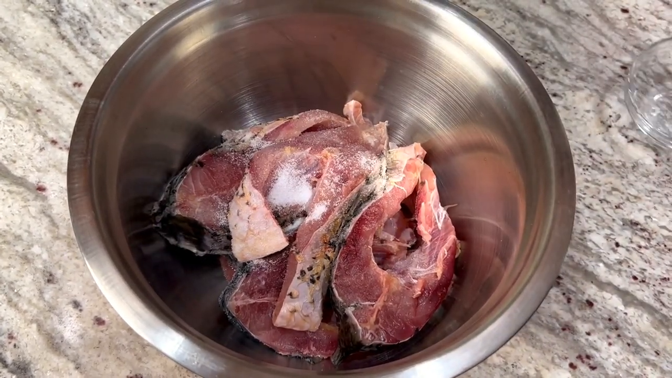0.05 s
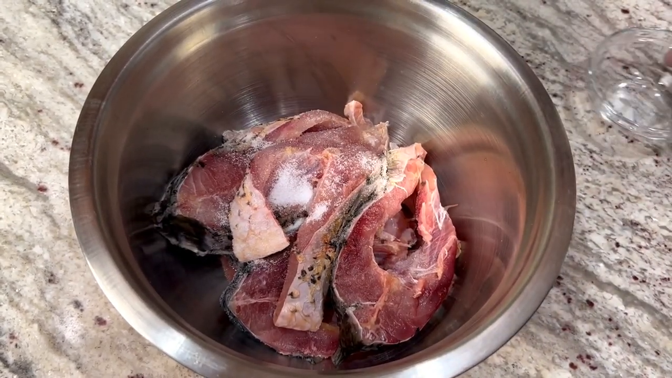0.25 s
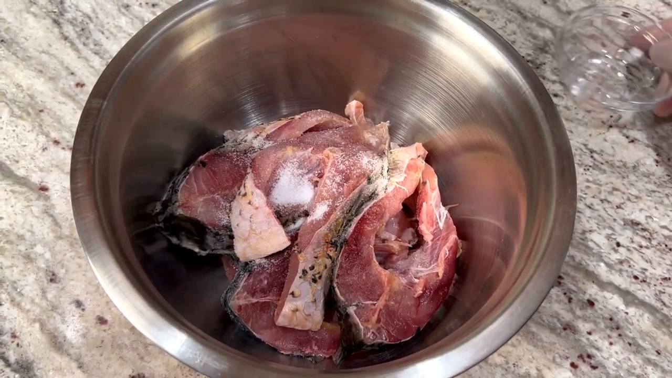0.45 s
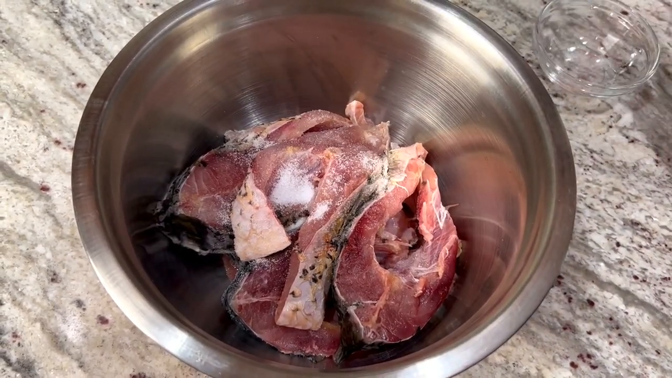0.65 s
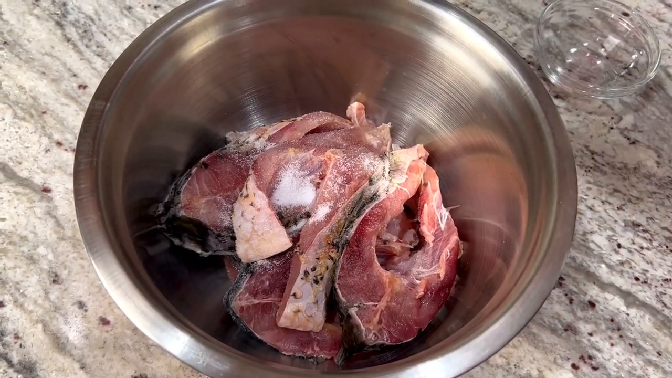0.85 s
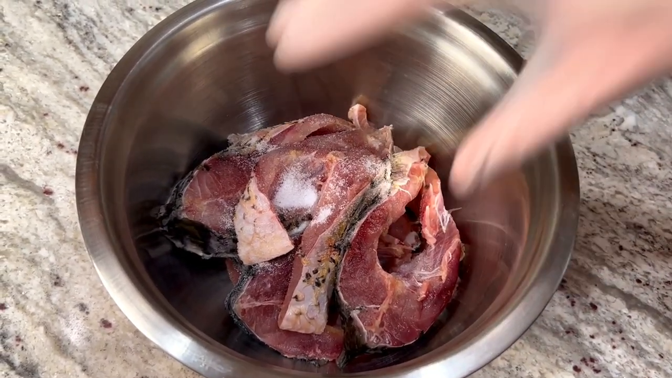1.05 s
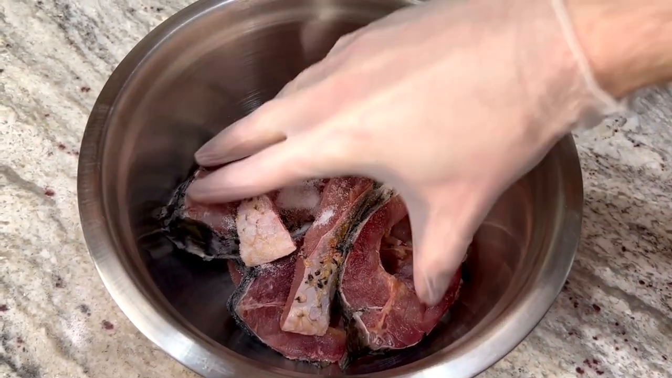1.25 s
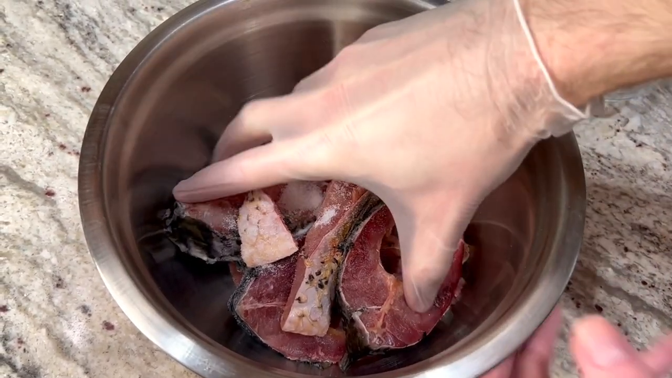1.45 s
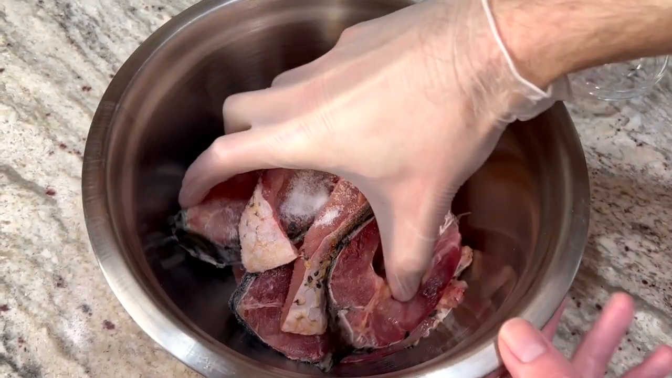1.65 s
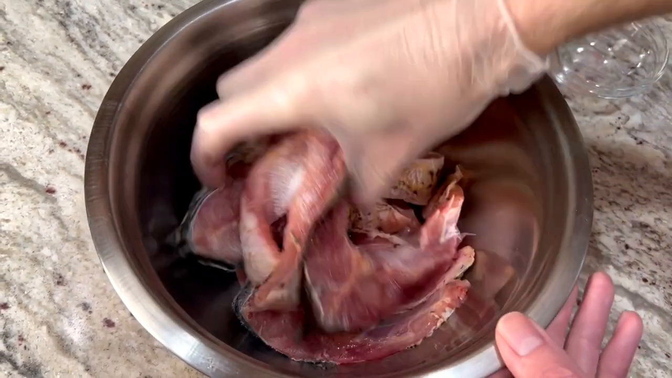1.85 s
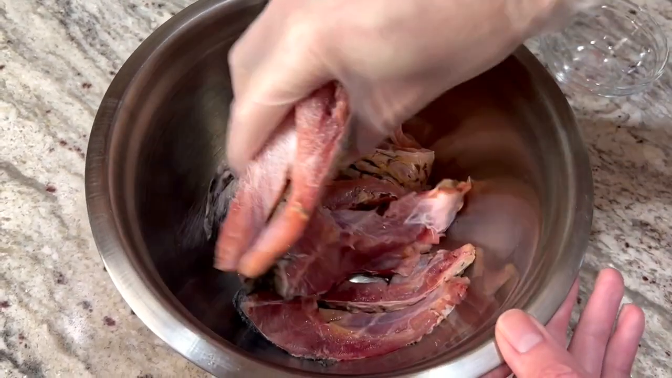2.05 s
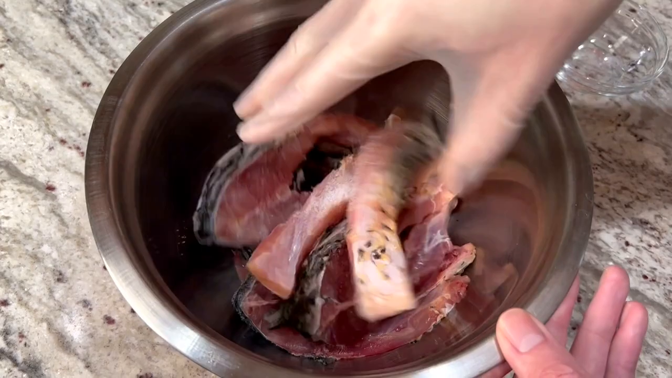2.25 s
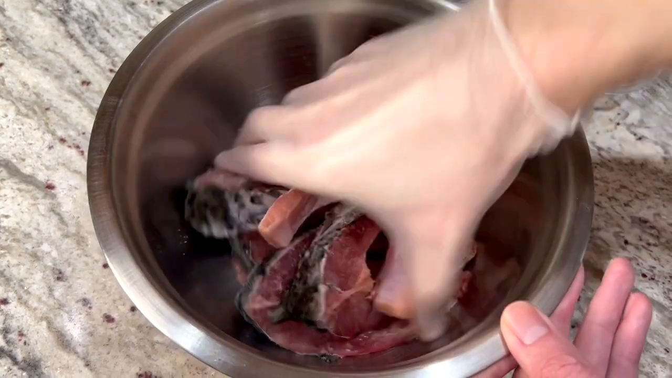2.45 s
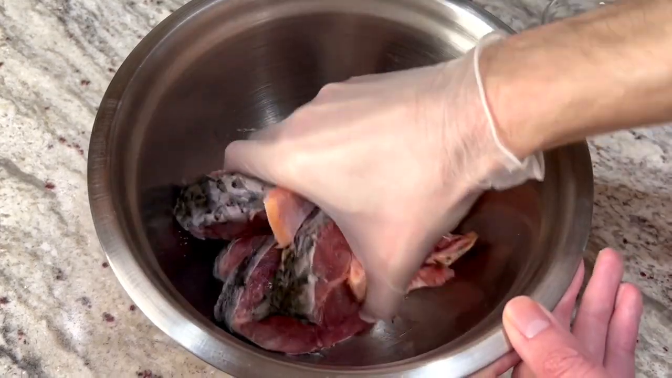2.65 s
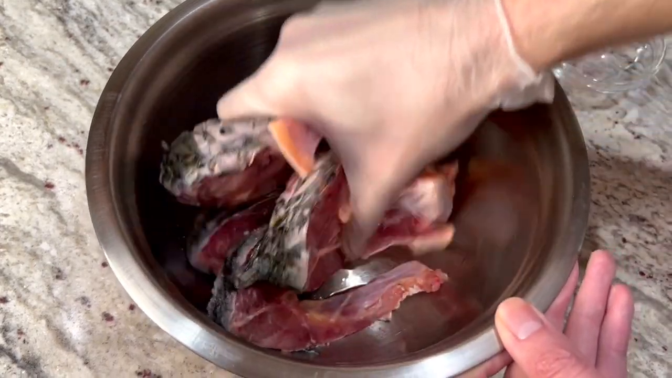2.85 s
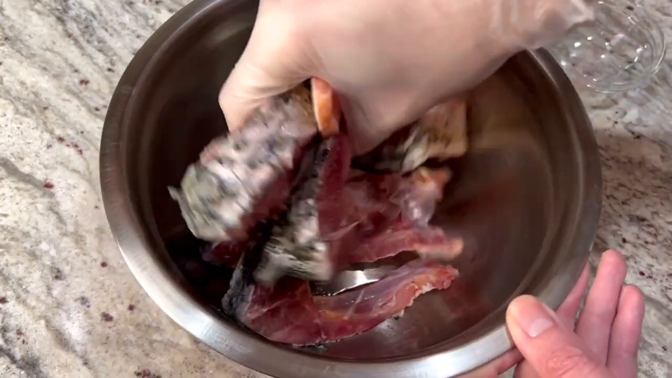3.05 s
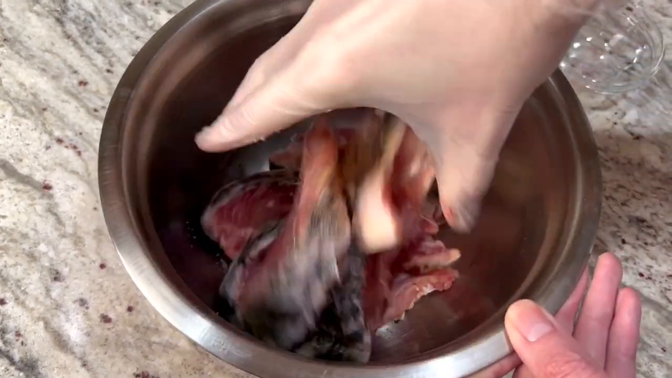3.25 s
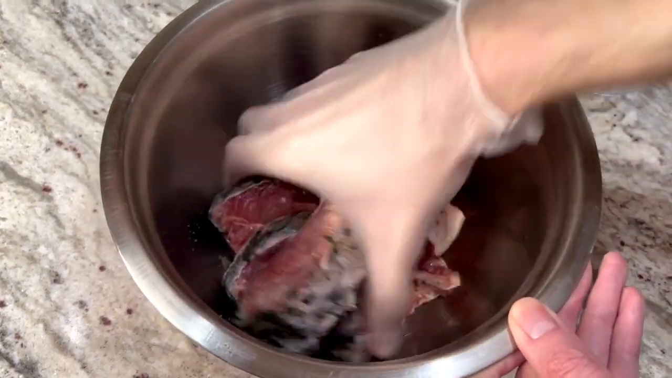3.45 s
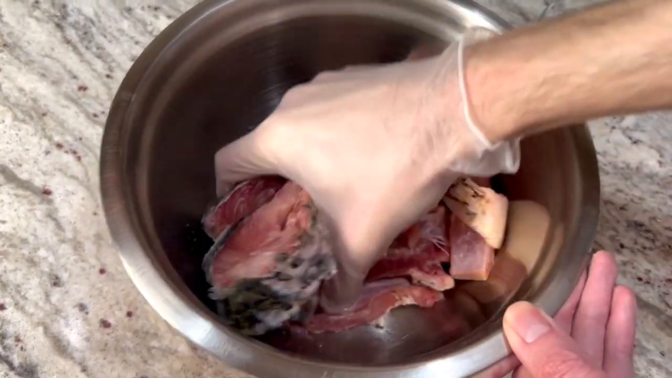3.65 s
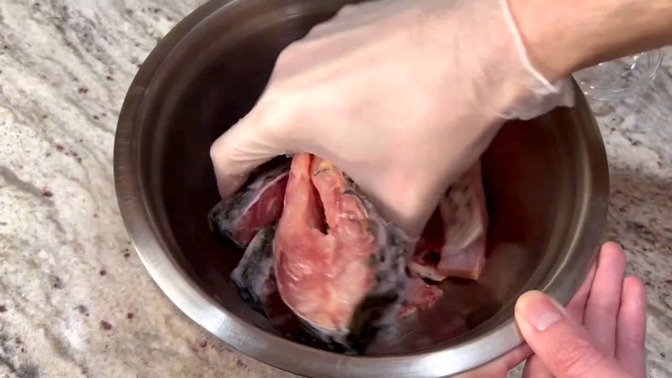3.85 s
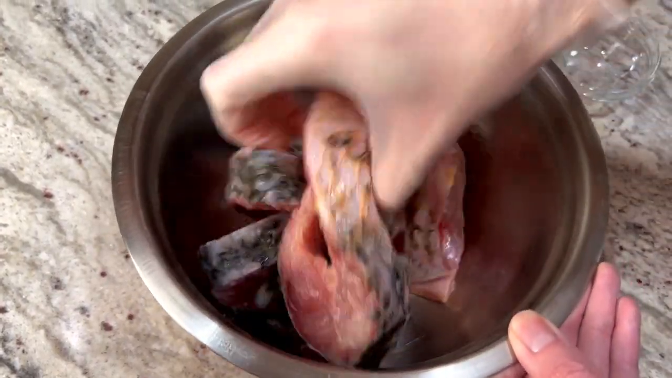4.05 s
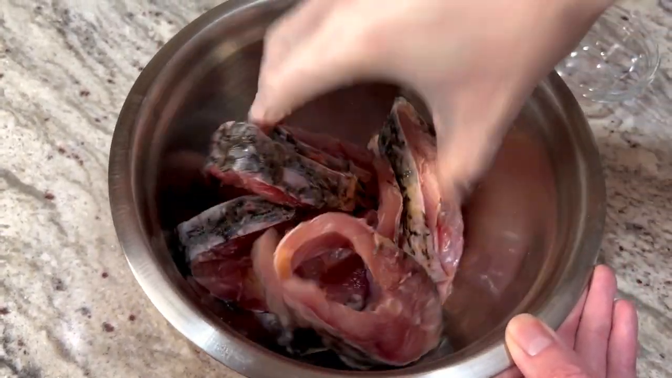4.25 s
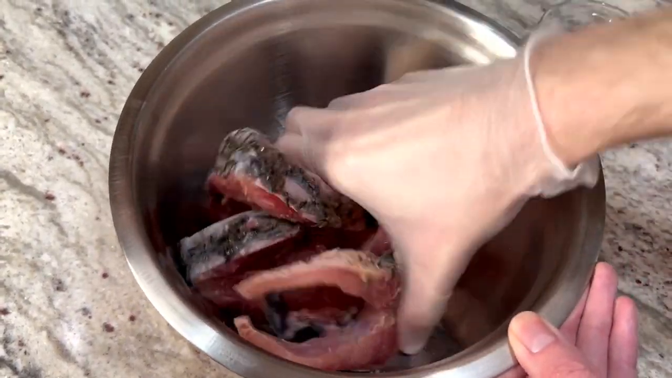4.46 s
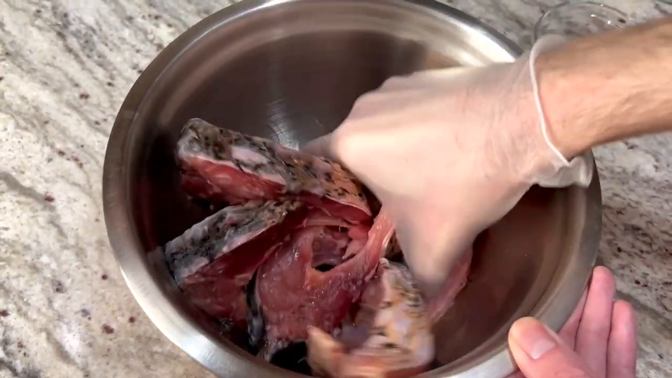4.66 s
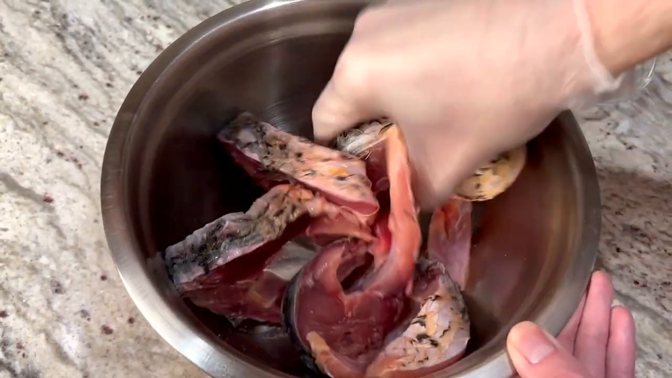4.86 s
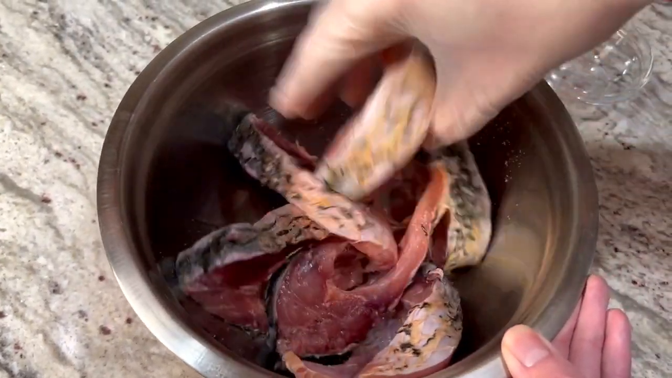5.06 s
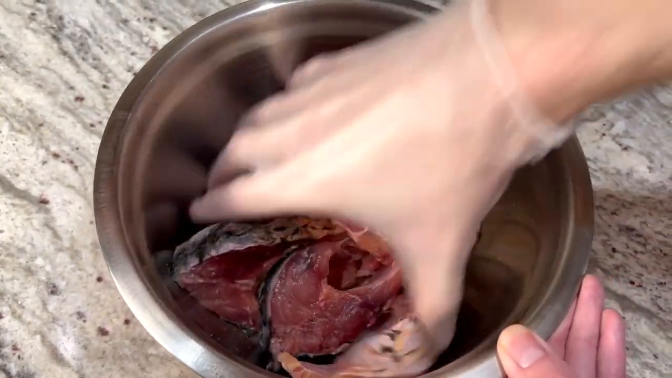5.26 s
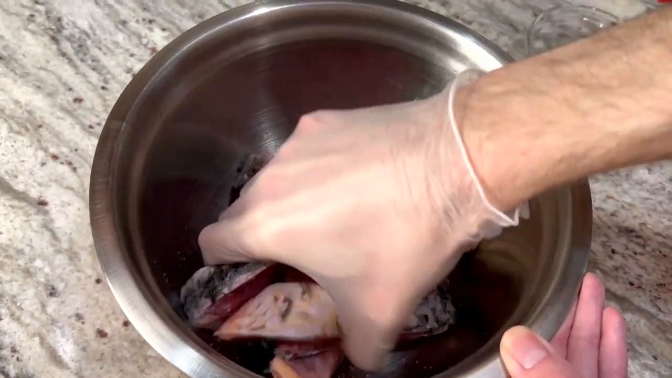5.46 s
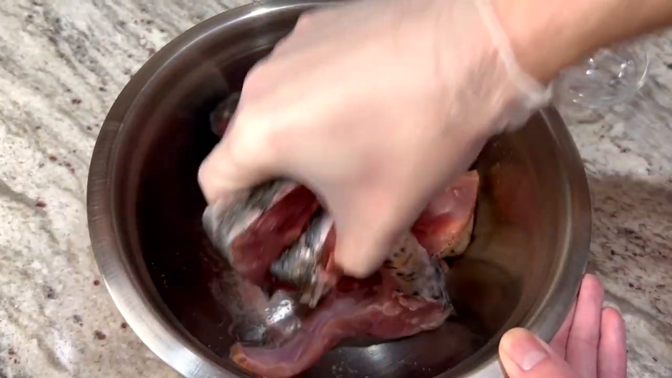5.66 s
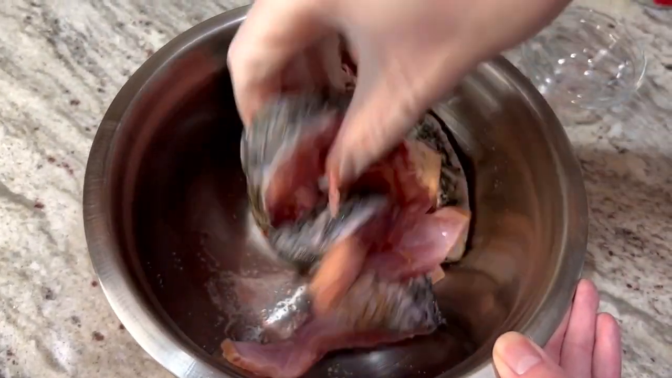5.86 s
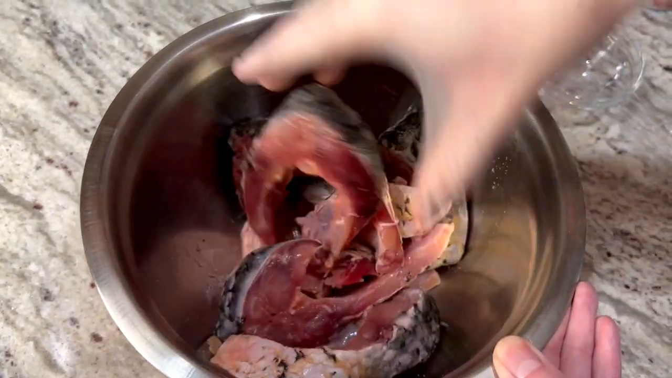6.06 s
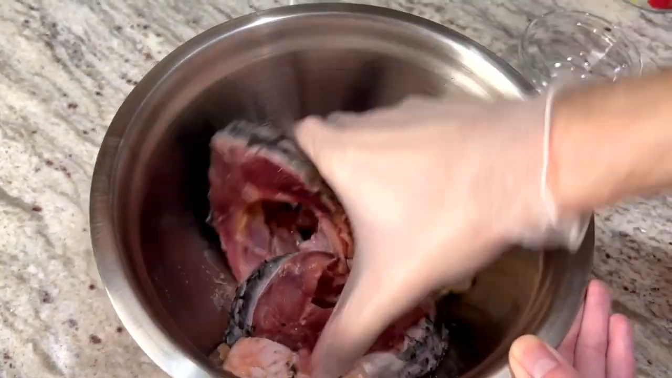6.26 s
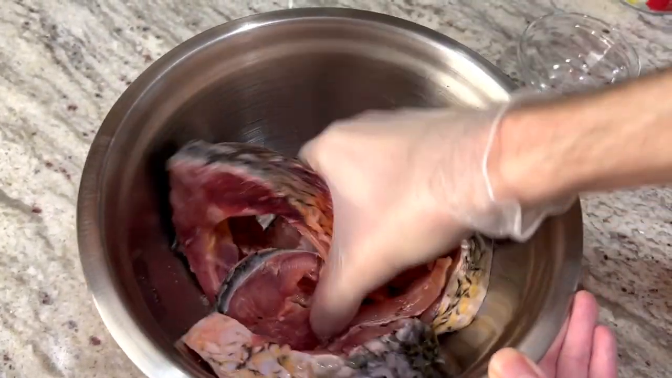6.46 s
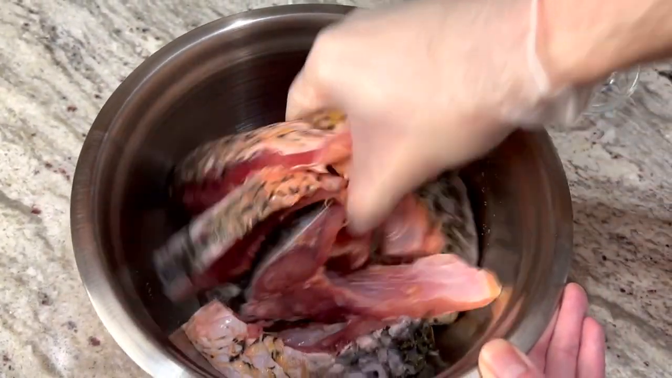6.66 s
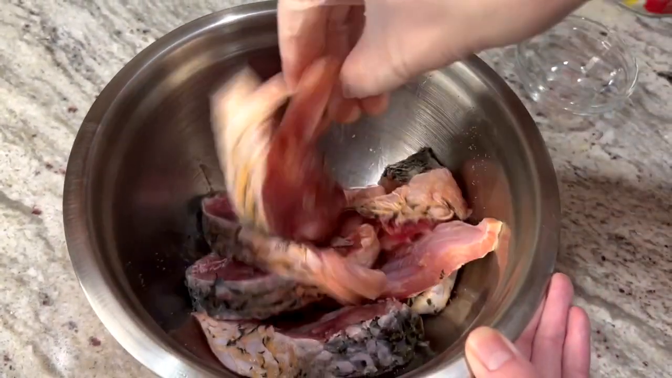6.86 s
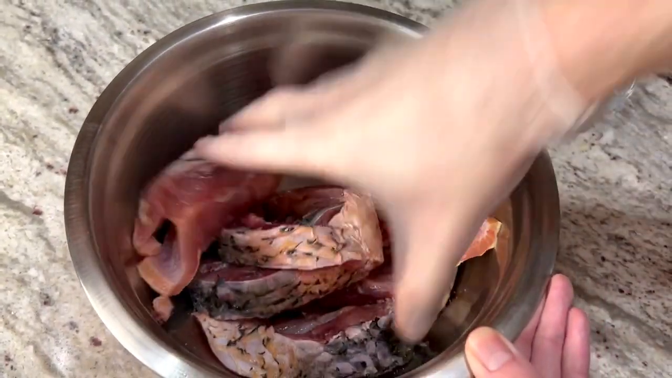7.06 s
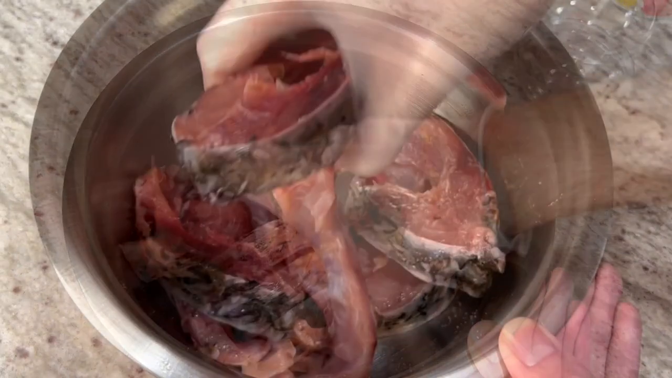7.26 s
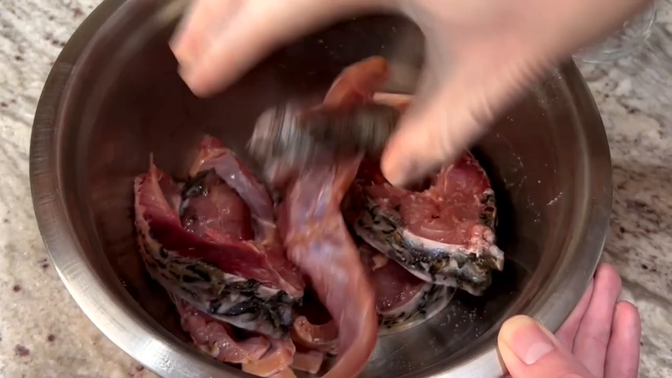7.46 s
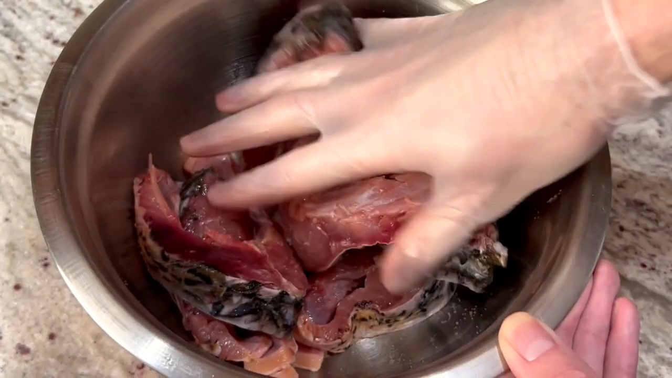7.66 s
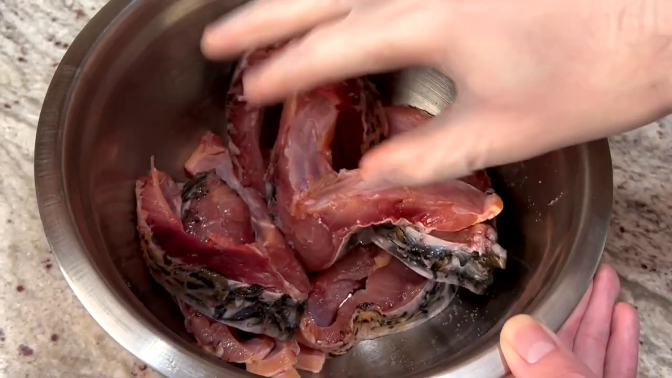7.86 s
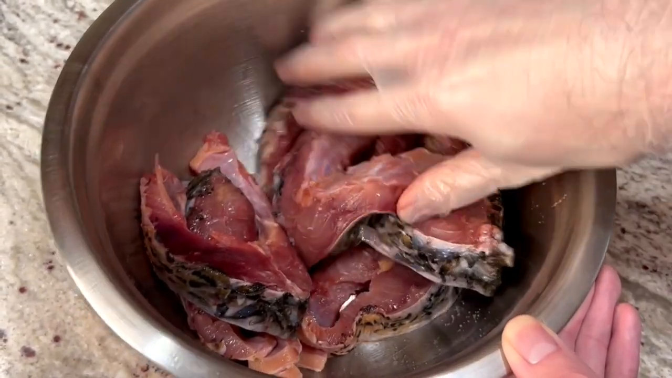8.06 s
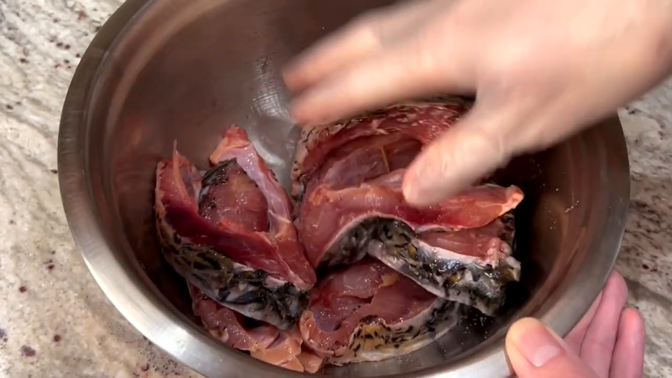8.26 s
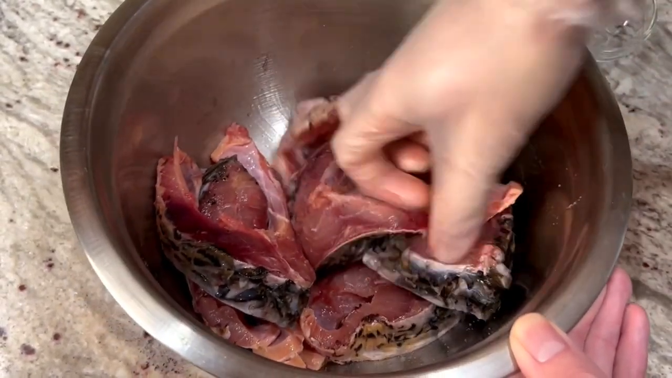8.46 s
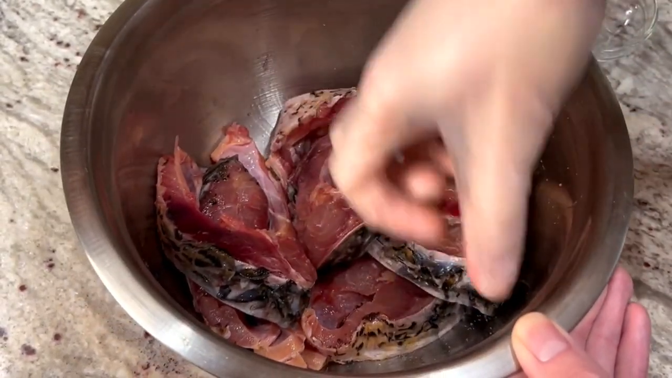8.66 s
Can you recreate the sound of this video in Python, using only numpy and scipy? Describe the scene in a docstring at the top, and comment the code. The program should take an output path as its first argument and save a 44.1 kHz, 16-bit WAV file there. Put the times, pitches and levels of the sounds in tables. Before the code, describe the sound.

A small glass dish rattles down onto a stone counter, then gloved hands toss wet, salted fish pieces in a metal bowl with squelches and scrapes.

```python
"""A very quiet kitchen. A small glass dish is set down on a stone counter and rattles to rest: short noise bursts
in the colour of glass on stone set its modes ringing. Then a gloved hand turns salted fish pieces in a steel bowl,
about one stroke a second. The heap drags over the bottom, scrapes up the wall and squelches, and salt grates:
all are showers of tiny random contacts through resonances. Wet skin snaps, pieces drop back and the bowl rocks."""
import sys
import numpy as np
from scipy import signal
from scipy.fft import rfft, irfft
from scipy.io import wavfile

SR = 44100
rng = np.random.default_rng(int(sys.argv[2]) if len(sys.argv) > 2 else 0)


def unload_audio(sound):
    """Save the sound as a 16-bit wav file, at the path given as the first command line argument."""
    columns = np.transpose(np.atleast_2d(sound))
    # keep every value between -1 and 1, then stretch to whole-number steps
    steps = np.round(np.clip(columns, -1, 1) * 32767)
    wavfile.write(sys.argv[1], SR, steps.astype(np.int16))


N = 384111
TIME = np.arange(N) / SR
STEP_TIME = TIME[::32]   # the slow clock on which hand movements are laid out

# In all tables level_db is relative: the function that plays the table may shift it.
# t60_s is the time in which a sound dies by 60 dB.


def from_db(db):
    """Turn decibels into a gain."""
    return np.exp(np.asarray(db) * (np.log(10) / 20))


def rms_one(x):
    """Scale a sound to an rms of one."""
    return x / np.sqrt(np.mean(x ** 2) + 1e-20)


def gains(rows):
    """Turn level columns into one gain per sample, silent outside the table's times."""
    s, *columns = np.transpose(rows)
    inside = (TIME >= s[0]) * (TIME <= s[-1])
    return [from_db(np.interp(TIME, s, column)) * inside for column in columns]


def add(track, s, sound):
    """Mix a sound into a track at time s."""
    start = int(s * SR)
    track[start:start + len(sound)] += sound[:N - start]


def convolve(x, response):
    """Pass a sound through an impulse response and keep its length."""
    return signal.oaconvolve(x, response)[:len(x)]


def at_hz(points, size):
    """Read a (pitch_hz, level_db) table at the frequencies of an FFT."""
    hz, db = np.transpose(points)
    return np.interp(np.log(np.fft.rfftfreq(size, 1 / SR) + 1), np.log(hz), db)


def response_of(points, size=4096):
    """Build a response with the table's spectrum that starts as promptly as possible (minimum phase)."""
    cepstrum = irfft(np.log(from_db(at_hz(points, size=size))))[:size // 2]
    cepstrum[1:] *= 2
    return irfft(np.exp(rfft(cepstrum, size)))


def colour(x, points):
    """Shape the spectrum of a sound and keep its power."""
    return rms_one(convolve(x, response_of(points))) * np.std(x)


def fade(t60):
    """Die away exponentially, by 60 dB in t60 (at least 2 ms), followed down to 120 dB."""
    t60 = max(t60, .002)
    return np.exp(-np.log(1000) * TIME[:int(2 * t60 * SR)] / t60)


def tail(t60):
    """Make dense dying echoes from fading noise, with unit energy."""
    envelope = fade(t60)
    echoes = envelope * rng.standard_normal(2 * SR)[:len(envelope)]
    return echoes / np.linalg.norm(echoes)


def resonate(x, hz, width_hz):
    """Favour one pitch as a damped body does: a two-pole resonance with gain 1 on top."""
    r = np.exp(-np.pi * width_hz / SR)
    top = np.array([1, 0, -1]) * (1 - r * r) / 2
    bottom = [1, -2 * r * np.cos(2 * np.pi * hz / SR), r * r]
    return signal.lfilter(top, bottom, x + 1e-18)


def ring(x, modes):
    """Let a force set fading sine waves going, as a unit click does at each mode's level."""
    t = TIME[:SR]   # every mode has died within a second
    response = sum(from_db(db) * np.exp(-np.log(1000) * t / t60) * np.sin(2 * np.pi * hz * t)
                   for hz, db, t60 in modes)
    return convolve(x, response)


def struck(events, modes, soft_hz, low_hz=36):
    """Strike a body's modes softly: only the band from low_hz to soft_hz is kept."""
    pushes = np.zeros(N)
    for s, db in events:
        add(pushes, s, from_db([db]))
    band = signal.butter(4, [low_hz, soft_hz], "band", fs=SR, output="sos")
    return signal.sosfilt(band, ring(pushes, modes) + 1e-18)


def flicker(per_s, count=2000):
    """Waver randomly within bounds, with an rms of 1."""
    return rms_one(np.interp(TIME * per_s, np.arange(count), rng.uniform(-1, 1, count)))


def grains(per_s, spread_db, count=30000):
    """Scatter tiny clicks of unequal size at random times; rms 1."""
    at = np.flatnonzero(rng.random(N) < per_s / SR)
    size, sign = np.resize(rng.standard_normal((count, 2)), (len(at), 2)).T
    clicks = np.zeros(N)
    clicks[at] = from_db(spread_db * np.clip(size, -2, 2)) * np.sign(sign)
    return rms_one(clicks)


def shares(levels_db, patchy_db, change_per_s):
    """Let resonances take turns to prevail while the sum of their squared gains stays the same."""
    weights = np.array([from_db(db + patchy_db * flicker(change_per_s)) for db in levels_db])
    return weights / np.sqrt(np.sum(weights ** 2, axis=0))


def rub(modes, per_s, spread_db, patchy_db, change_per_s, damping=1.57):
    """Shake resonances with stick-slip contacts; the place of contact changes which ones sound; rms 1."""
    slips = grains(per_s, spread_db)
    levels_db = [db for _, _, db in modes]
    out = np.zeros(N)
    for (hz, width, _), share in zip(modes, shares(levels_db, patchy_db, change_per_s)):
        push = slips * rng.uniform(-1.155, 1, N) * share
        once = resonate(push, hz, damping * width)   # damping widens each resonance
        out += resonate(once, hz, damping * width)
    return rms_one(out)


def crackle(low_hz, high_hz, per_s, spread_db, patchy_db, change_per_s, width, count=12):
    """Let tiny wet contacts each ring briefly; the pitches that prevail keep changing; rms 1."""
    pitches = np.geomspace(low_hz, min(high_hz, .42 * SR), count)
    prevailing = shares(np.zeros(count), patchy_db, change_per_s)
    return rms_one(sum(resonate(grains(per_s / count, spread_db), hz, width * hz) * share
                       for hz, share in zip(pitches, prevailing)))


def burst(t60, rise_s):
    """Make one contact: a flurry of micro-impacts that swells quickly and dies away."""
    decay = fade(t60)
    envelope = decay * (1 - np.exp(-TIME[:len(decay)] / rise_s))
    return envelope / envelope.max() * rng.choice([-1., 1.], SR)[:len(envelope)]


def contact(hz, t60, spectrum, width, broad_db, rise_s, size=2048):
    """Give a burst the colour of its material, strongest round its own pitch."""
    body = response_of(spectrum)[:size]
    body = resonate(body, hz, width * hz) + from_db(broad_db) * body
    return signal.fftconvolve(burst(t60, rise_s), body / np.linalg.norm(body))


# the colour of the still kitchen: pitch_hz, level_db
STILL_KITCHEN_COLOUR = [(25, -11), (60, 17.5), (150, -15.5), (500, -40.5), (2000, -37), (12000, -37)]


def room_tone(tone_db=-86, hum_hz=310, hum_db=-92):
    """The still room is soft coloured noise with a faint steady hum, a plain sine."""
    noise = from_db(tone_db) * colour(rng.standard_normal(N), STILL_KITCHEN_COLOUR)
    return noise + from_db(hum_db) * np.sqrt(2) * np.sin(2 * np.pi * hum_hz * TIME)


# how firmly the fingers knead between strokes, as the level of the salt: time_s, level_db
KNEADING = [(.97, -95), (1.03, -68.5), (1.12, -73), (1.17, -82), (1.25, -61), (1.4, -69.5), (1.7, -56.5),
            (2.27, -56.5), (2.42, -62), (2.7, -49), (3.27, -55), (3.8, -50.5), (4.35, -56.5), (4.72, -43.5),
            (5.19, -62.5), (5.28, -97), (5.48, -48.5), (5.83, -63), (6.5, -50.5), (6.88, -54),
            (6.98, -66.5), (7.34, -54.5), (7.46, -68), (7.66, -57), (7.97, -76.5), (8.2, -62.5),
            (8.34, -74.5), (8.56, -55.5), (8.7, -99.5)]
# the colour of the held bowl rumbling on the counter: pitch_hz, level_db
RUMBLE_COLOUR = [(25, -18), (60, -6), (110, -5), (185, 1), (250, -7), (350, -4), (550, -30)]


def rumble(tremble, held_db=-76):
    """The steadying hand makes the bowl tremble on the counter, and most shoves do so much more."""
    kneading, = gains(KNEADING)
    force = from_db(held_db) * np.sqrt(kneading / kneading.max()) + tremble
    return force * colour(grains(per_s=400, spread_db=3), RUMBLE_COLOUR)


# the bowl rocks on the counter: start_s, level_db
ROCKING_TIMES = [(1.526, -49), (1.773, -30), (1.89, -34), (1.921, -26.5), (2.501, -42.5), (2.581, -49),
                 (3.217, -42), (3.335, -42), (3.488, -31), (4.411, -54), (4.559, -41.5), (5.319, -42),
                 (5.857, -46), (6.041, -40.5), (6.828, -42.5), (7.161, -42), (7.21, -32), (8.528, -43)]
# the deep notes of the rocking bowl: pitch_hz, level_db, t60_s
ROCKING_MODES = [(47.6, -15, 0.029), (70.5, -4, 0.35), (108.1, -11.5, 0.28), (146, -4, 0.033)]


def rocking(rock_db=-2):
    """Each rock of the bowl is a soft blow that sets deep, quickly fading notes going."""
    return from_db(rock_db) * struck(ROCKING_TIMES, ROCKING_MODES, soft_hz=143)


# the dish knocks on the counter: start_s, level_db
KNOCKS = [(0.255, -6.5), (0.299, -6.5), (0.321, -8), (0.335, -12.5), (0.455, -18.5), (0.54, -7),
          (0.597, -9.5), (0.621, -15.5), (0.641, -19), (0.672, -9)]
# the dish chatters on its rim, one list for each bout: time_s, level_db
RIM_CHATTER = [
    [(0.335, -37), (0.367, -27), (0.41, -45)],
    [(0.453, -33.5), (0.461, -30.5), (0.474, -43)],
    [(0.58, -40), (0.604, -20), (0.692, -30), (0.725, -46.5)],
]
# the clack of glass on stone: pitch_hz, level_db
GLASS_ON_STONE_COLOUR = [(30, -35), (70, -6), (180, -17), (250, -50), (370, -11), (500, -3.5), (1400, -5),
                         (1900, 3.5), (2900, -3.5), (4200, -9.5), (5400, -21), (8000, -29.5), (10200, -62),
                         (12800, -12.5), (14500, -48)]
# the ringing notes of the dish: pitch_hz, level_db, t60_s
GLASS_MODES = [(538, -4, .1), (716, -4, .15), (1090, 1, .17), (1286, -2, .15), (1766, 3, .22),
               (1790, 2, .17), (1875, -5, .25), (1930, 0, .14), (1997, -3, .22), (2195, 1, .13),
               (2390, -4, .15), (2681, 0, .18), (3378, -1, .15), (3638, -3, .17), (3681, -4, .14),
               (4538, -13, .12), (6690, -17, .14), (7955, -21, .14), (12740, -4, .13)]


def dish(knock_db=-9, rattle_db=-3, echo_s=0.0054, echo_db=-2, scatter_db=-8, ring_db=-40):
    """Hard knocks, each thrown back by a near surface, and rim chatter drive the glass, which rings on."""
    chatter = sum(gains(bout)[0] for bout in RIM_CHATTER)
    force = from_db(rattle_db) * chatter * grains(per_s=2300, spread_db=0.5)
    for s, db in KNOCKS:
        level_db = db + knock_db
        add(force, s, from_db(level_db) * burst(t60=0.014, rise_s=0.000095))
        add(force, s + echo_s, from_db(level_db + echo_db) * burst(t60=0.0012, rise_s=0.000067))
        add(force, s, from_db(level_db + scatter_db) * burst(t60=0.15, rise_s=0.0022))
    return colour(force, GLASS_ON_STONE_COLOUR) + from_db(ring_db) * ring(force, GLASS_MODES)


# the fingers let go of the dish: start_s, level_db
LETTING_GO = [(0.641, -31)]
# the notes of the free dish: pitch_hz, level_db, t60_s
FREE_GLASS_MODES = [(1875, -6, .35), (1997, 2, .45), (4538, -3, .38)]


def dish_singing():
    """Once the fingers let go, a few notes of the glass sing on for longer."""
    return struck(LETTING_GO, FREE_GLASS_MODES, soft_hz=8000)


# the hand lets go of the bowl: start_s, level_db
RIM_RELEASES = [(3.35, -68), (6.02, -50), (7.81, -53.5)]
# the faint notes of its free rim: pitch_hz, level_db, t60_s
FREE_RIM_MODES = [(1680, -12, .14), (2396, 0, .55), (3268, -4, .5), (5400, -6, .5), (6000, -9, .4)]


def rim_ring():
    """The hand lets go and the free steel rim rings faintly in fading notes."""
    return struck(RIM_RELEASES, FREE_RIM_MODES, soft_hz=7000)


# hollow gulps under a piece: start_s, level_db
GULP_TIMES = [(3.994, -32), (4.028, -45.5)]
# the notes of the air pocket: pitch_hz, level_db, t60_s
AIR_POCKET_MODES = [(285, -4, 0.13), (307.7, -8, 0.29), (1027, -15.5, 0.18)]


def gulps():
    """An air pocket under a piece of fish gives a hollow gulp at its own low notes."""
    return struck(GULP_TIMES, AIR_POCKET_MODES, soft_hz=1500, low_hz=197)


# the glove squeaks as it first grips: time_s, level_db
FIRST_GRIP = [(1.515, -66), (1.527, -40), (1.57, -64), (1.62, -51), (1.685, -42.5), (1.71, -66)]
# the pitches of the squeak: pitch_hz, width_hz (before damping), level_db
SQUEAK_MODES = [(4130, 89, 1.5), (4880, 140, -5), (5670, 840, -11), (7680, 170, -1)]


def grip(catch_db=4):
    """The glove sticks and slips on the skin of the fish, a squeak of flickering level."""
    squeak = rub(SQUEAK_MODES, per_s=500, spread_db=2, patchy_db=6, change_per_s=45)
    return gains(FIRST_GRIP)[0] * from_db(catch_db * flicker(per_s=130)) * squeak


# the colour of ticks and snaps: pitch_hz, level_db
SNAP_COLOUR = [(200, -37.5), (600, -44.5), (1500, -8.5), (3500, -7.5), (7000, -1), (10000, -6), (15000, -4),
               (16500, -14.5)]


def pops(squelch, salt, per_s=45, pop_db=-8, tick_db=-9, typical_db=-52):
    """Films of juice burst as short ringing pops and scales tick on the steel, loosely following the hand."""
    stir = np.sqrt(squelch * salt)
    loose_stir = 2 * stir / (1 + stir / from_db(typical_db))   # strong strokes add little more
    pitches = np.geomspace(1900, 9000, 10)
    films = sum(resonate(grains(per_s / len(pitches), spread_db=8.5), hz, 0.0068 * hz) for hz in pitches)
    ticks = colour(convolve(grains(per_s=30, spread_db=3), tail(t60=0.0016)), SNAP_COLOUR)
    return loose_stir * (from_db(pop_db) * rms_one(films) + from_db(tick_db) * ticks)


# wet skin, bone and glove snap: start_s, level_db, pitch_hz (centre), t60_s
SNAP_TIMES = [(1.258, -34.5, 2670, 0.027), (1.289, -33.5, 4260, 0.075), (1.426, -40.5, 7400, 0.27),
              (1.4932, -34, 7600, 0.025), (1.522, -30, 4400, 0.029), (1.696, -26, 4640, 0.057),
              (1.8878, -30.5, 2120, 0.09), (1.936, -23.5, 12600, 0.047), (2.5012, -22.5, 8340, 0.073),
              (2.804, -27.5, 7400, .023), (2.8814, -19.5, 12000, 0.0079), (3.319, -19, 7650, 0.15),
              (3.351, -11, 1730, 0.028), (3.602, -19.5, 2200, 0.033), (4.1013, -29.5, 1860, 0.072),
              (4.1726, -23, 1950, 0.082), (4.4029, -18, 7230, 0.031), (4.421, -16, 10200, 0.09),
              (4.559, -18.5, 1690, 0.15), (5.3084, -19.5, 7550, 0.21), (5.402, -16.5, 7640, 0.027),
              (5.5605, -18.5, 13300, 0.0077), (6.018, 1.5, 7080, 0.028), (6.206, -32, 7500, 0.16),
              (6.3654, -17, 8310, 0.064), (7.4864, -39, 3300, 0.18), (7.5069, -13.5, 13150, 0.061),
              (7.8056, -28, 7360, 0.14), (7.953, -43, 2570, .04), (8.385, -44, 2550, 0.12)]
# pieces drop against the steel: start_s, level_db, pitch_hz (centre), t60_s
SLAP_TIMES = [(1.756, -29.5, 680, 0.048), (1.886, -44, 2100, 0.067), (2.475, -27, 566, 0.021),
              (2.74, -25, 870, 0.011), (3.317, -24.5, 1150, 0.046), (3.348, -10.5, 1730, 0.013),
              (3.386, -23, 710, 0.02), (3.467, -15.5, 555, 0.035), (3.498, -18, 602, 0.071),
              (4.401, -17.5, 590, 0.034), (4.587, -10.5, 644, 0.018), (5.306, -23.5, 540, 0.047),
              (5.427, -25, 874, 0.057), (6.016, -22, 1180, 0.073), (6.454, -18.5, 602, 0.04),
              (7.161, -20.5, 550, 0.028), (8.155, -20.5, 984, 0.041)]
# the colour of a slap: pitch_hz, level_db
SLAP_COLOUR = [(80, -15), (250, -10.5), (550, 9), (1100, -3.5), (2200, -3.5), (4000, -14), (9000, 12)]


def hits(snap_db=-9, slap_db=-7):
    """Sharp wet snaps and the duller slaps of falling pieces are coloured bursts, each round its own pitch."""
    out = np.zeros(N)
    for s, db, hz, t60 in SNAP_TIMES:
        snap = contact(hz, t60, SNAP_COLOUR, width=0.27, broad_db=-21.5, rise_s=0.00011)
        add(out, s, from_db(db + snap_db) * snap)
    for s, db, hz, t60 in SLAP_TIMES:
        slap = contact(hz, t60, SLAP_COLOUR, width=0.44, broad_db=-29.0, rise_s=0.000093)
        add(out, s, from_db(db + slap_db) * slap)
    return out


def gesture(start, end, rise_db_per_s, fall_db_per_s, sag_db_per_s=0):
    """Shape one movement: it swells up to its start, may lose a little force, and dies after its end."""
    t = STEP_TIME
    rise_db = -rise_db_per_s * np.clip(start - t, 0, 1)
    sag_db = -sag_db_per_s * np.clip(t - start, 0, end - start)
    fall_db = -fall_db_per_s * np.clip(t - end, 0, 1)
    return from_db(rise_db + sag_db + fall_db)


def together(parts):
    """Add overlapping movements in power; one gain per sample."""
    return np.interp(TIME, STEP_TIME, np.sqrt(sum(part ** 2 for part in parts)))


# the hand shoves the heap across the bottom until it rides up the wall: start_s, at_wall_s, drag_db,
# salt_db, tremble_db (of the bowl), wall_db (scrape on the wall), wet_db (squelch at the wall)
HEAP_SHOVES = [(2.479, 2.647, -29.5, -37.5, -44.5, -31, -35.5), (3.456, 3.638, -35.5, -38, -50, -33, -39.5),
               (4.401, 4.657, -34, -38, -56, -29, -34.5), (5.308, 5.462, -36, -41, -49.5, -38, -42.5),
               (6.251, 6.419, -38, -37.5, -90, -34, -33.5), (7.158, 7.314, -39, -41.5, -54, -33.5, -36.5)]
SHOVE_RISE_DB_PER_S, SHOVE_SAG_DB_PER_S, SHOVE_FALL_DB_PER_S = 1805, 44, 244.5
SHOVE_WALL_DB, SHOVE_WET_DB = -42.5, -47   # the wall and the juice sound all through a shove
RIDE_RISE_DB_PER_S, RIDE_FALL_DB_PER_S = 275.5, 363
# a single piece slides on the steel: start_s, length_s, level_db, height (0 bottom to 1 wall, no unit),
# wet_db (squelch)
PIECE_SLIDES = [(1.434, 0.0068, -48, 0.05, -87), (1.535, .005, -56, 0.47, -76),
                (1.638, 0.043, -52, 0.39, -57.5), (1.758, 0.0091, -46, .4, -47),
                (2.742, 0.013, -38.5, 0.86, -54), (3.199, 0.045, -56.5, 0.07, -54.5),
                (3.322, 0.089, -45.5, 0.78, -49.5), (3.74, 0.034, -44.5, 0.7, -47),
                (3.982, 0.03, -63, 0.22, -72), (4.145, 0.022, -50, 0.65, -46),
                (4.523, 0.051, -38.5, 0.65, -43.5), (4.699, 0.072, -51.5, 0.45, -73),
                (4.909, 0.026, -51.5, 0.47, -45), (5.146, 0.084, -58.5, 0.71, -51.5),
                (6.013, 0.05, -49, 0.71, -45), (6.443, 0.042, -40, 0.55, -43.5),
                (6.706, 0.033, -55.5, .1, -52), (6.807, 0.028, -51.5, 0.64, -48),
                (7.131, 0.016, -46, 0.16, -56), (7.66, 0.016, -56.5, .55, -49.5),
                (7.735, 0.086, -56, 0.14, -58), (8.134, 0.1, -50, 0.84, -48.5),
                (8.487, 0.028, -61.5, 0.42, -53)]
SLIDE_RISE_DB_PER_S, SLIDE_FALL_DB_PER_S, SLIDE_SALT_DB = 746.5, 392, -3   # salt relative to the squelch
# the fingers rub salt over the skin: start_s, length_s, level_db
SALT_RUBS = [(2.903, 0.035, -48.5), (3.895, 0.024, -49.5), (4.107, 0.1, -45.5), (4.814, 0.14, -40),
             (5.06, 0.065, -37), (6.727, .1, -47), (7.136, .03, -42.5), (8.061, 0.15, -49),
             (8.488, 0.035, -64)]
RUB_RISE_DB_PER_S, RUB_FALL_DB_PER_S, RUB_WET_DB = 419, 233, -16   # squelch relative to the salt
KNEADING_WET_DB, KNEADING_STEEL_DB = -4.5, -31.5   # squelch and steel relative to the salt


def hand():
    """The hand's movements drive drag on the bottom, scrape on the wall, squelch, salt and bowl tremble."""
    kneading = from_db(np.interp(STEP_TIME, *np.transpose(KNEADING))) * (STEP_TIME > KNEADING[0][0])
    steel = from_db(KNEADING_STEEL_DB) * kneading
    drag, scrape, tremble = [steel], [steel], []
    squelch, salt = [from_db(KNEADING_WET_DB) * kneading], [kneading]
    for start, at_wall, drag_db, salt_db, tremble_db, wall_db, wet_db in HEAP_SHOVES:
        shove = gesture(start, at_wall, SHOVE_RISE_DB_PER_S, SHOVE_FALL_DB_PER_S, SHOVE_SAG_DB_PER_S)
        ride = gesture(at_wall, at_wall, RIDE_RISE_DB_PER_S, RIDE_FALL_DB_PER_S)
        drag.append(from_db(drag_db) * shove)
        scrape += [from_db(SHOVE_WALL_DB) * shove, from_db(wall_db) * ride]
        squelch += [from_db(SHOVE_WET_DB) * shove, from_db(wet_db) * ride]
        salt.append(from_db(salt_db) * shove)
        tremble.append(from_db(tremble_db) * shove)
    for s, length, db, height, wet_db in PIECE_SLIDES:
        slide = gesture(s, s + length, SLIDE_RISE_DB_PER_S, SLIDE_FALL_DB_PER_S)
        # the height shares the power between bottom and wall
        drag.append(from_db(db) * np.cos(height * np.pi / 2) * slide)
        scrape.append(from_db(db) * np.sin(height * np.pi / 2) * slide)
        squelch.append(from_db(wet_db) * slide)
        salt.append(from_db(wet_db + SLIDE_SALT_DB) * slide)
    for s, length, db in SALT_RUBS:
        rubbing = from_db(db) * gesture(s, s + length, RUB_RISE_DB_PER_S, RUB_FALL_DB_PER_S)
        squelch.append(from_db(RUB_WET_DB) * rubbing)
        salt.append(rubbing)
    return [together(parts) for parts in (drag, scrape, squelch, salt, tremble)]


# resonances of the bowl's bottom, damped by the fish: pitch_hz, width_hz (before damping), level_db
BOWL_BOTTOM_MODES = [(333.6, 26, -6.5), (440.7, 45, -0.5), (571, 58, -1), (618, 62, 6), (702, 54, 4.5)]
# resonances of the bowl's wall, damped by the fish: pitch_hz, width_hz (before damping), level_db
BOWL_WALL_MODES = [(887, 95, -1.5), (1037, 71, 5), (1120, 64, 6), (1324, 290, -4), (1690, 82, 0)]
# the colour of wet squelching: pitch_hz, level_db
SQUELCH_COLOUR = [(900, -63.5), (1450, -3), (1700, 7), (1950, 6.5), (2200, 6.5), (2800, 3), (3400, 4),
                  (4500, -1.5), (6000, -3.5), (9000, -29.5)]
# the colour of grating salt: pitch_hz, level_db
SALT_COLOUR = [(2500, -42.5), (4500, -8.5), (5800, -7), (7200, 1), (8500, 0), (9900, -14), (11000, -2),
               (12700, -7.5), (14500, 0.5), (15300, -6.5), (16300, -26.5)]


def strokes(drag, scrape, squelch, salt, squelch_db=-1.0, salt_db=2, judder_db=1.0):
    """The heap judders over the steel; its rubbing, squelch and salt catch and slip together."""
    bottom = drag * rub(BOWL_BOTTOM_MODES, per_s=1100, spread_db=3, patchy_db=5, change_per_s=22)
    wall = scrape * rub(BOWL_WALL_MODES, per_s=1000, spread_db=3.0, patchy_db=8, change_per_s=22)
    juice = crackle(1500, 6000, per_s=4500, spread_db=5, patchy_db=6, change_per_s=32, width=.06)
    crystals = crackle(4000, 15500, per_s=17000, spread_db=4.5, patchy_db=4.5, change_per_s=28, width=.07)
    wet = from_db(squelch_db) * squelch * colour(juice, SQUELCH_COLOUR)
    grit = from_db(salt_db) * salt * colour(crystals, SALT_COLOUR)
    return (bottom + wall + wet + grit) * from_db(judder_db * flicker(per_s=83))


# how wide the near reflections sound: pitch_hz, level_db (side over middle)
STEREO_SPREAD = [(60, -16), (150, -15), (300, -8), (700, -9), (1300, -5), (2500, -10), (5500, -9),
                 (9000, -3), (15000, -5)]
# how much louder the left ear is: pitch_hz, level_db (left minus right)
LEFT_OVER_RIGHT = [(60, 0), (400, 1.5), (2500, 2.3), (5000, 1.5), (9000, 0), (15000, 0)]


def kitchen(x, t60, room_db=-11, near_t60=.045):
    """Near reflections reach the two ears differently, and a short, duller room tail follows."""
    near = convolve(convolve(x, tail(near_t60)), response_of(STEREO_SPREAD))
    dull = signal.sosfilt(signal.butter(1, 5000, fs=SR, output="sos"), x + 1e-18)
    ears = []
    for sign in (1, -1):   # left, right
        lead = response_of([(hz, sign * db / 2) for hz, db in LEFT_OVER_RIGHT])
        direct = convolve(x + sign * near, lead)
        ears.append(direct + from_db(room_db) * convolve(dull, tail(t60)))
    return np.array(ears)


def scene():
    """The dish, then the bowl, over a very quiet room."""
    glass = dish() + dish_singing()
    drag, scrape, squelch, salt, tremble = hand()
    bowl = rumble(tremble) + rim_ring() + gulps() + grip()
    bowl += pops(squelch, salt) + hits() + strokes(drag, scrape, squelch, salt)
    both_ears = room_tone() + rocking()   # the rocking is so deep that both ears get it alike
    return kitchen(glass, t60=0.37) + kitchen(bowl, t60=0.25) + both_ears


def record(dry):
    """Peaks are rounded off towards 0.85 and the treble above 15.9 kHz is cut steeply."""
    rounded = dry / (1 + (dry / .85) ** 6) ** (1 / 6)
    return signal.sosfilt(signal.ellip(10, .2, 80, 15900, fs=SR, output="sos"), rounded)


dry = scene()
out = record(dry)
unload_audio(out)
```